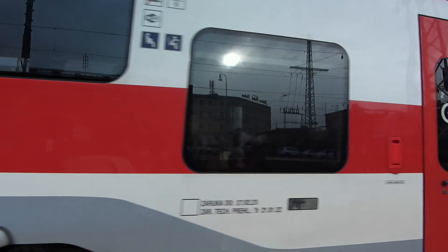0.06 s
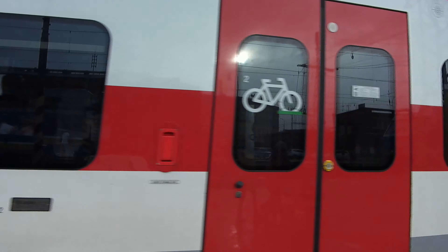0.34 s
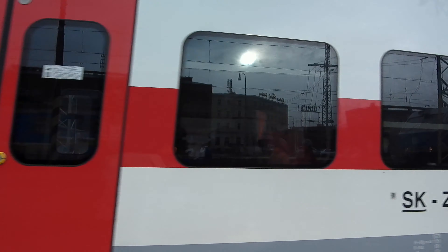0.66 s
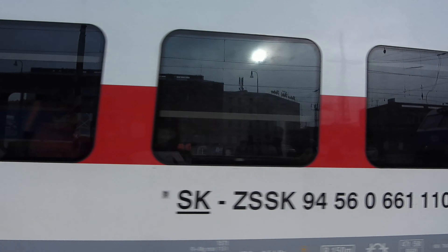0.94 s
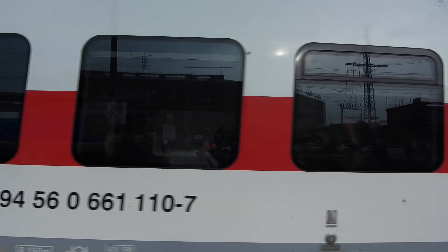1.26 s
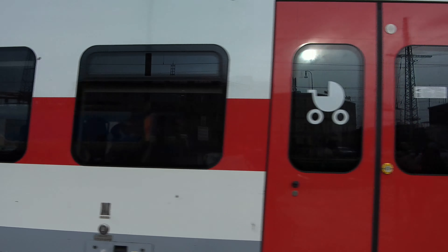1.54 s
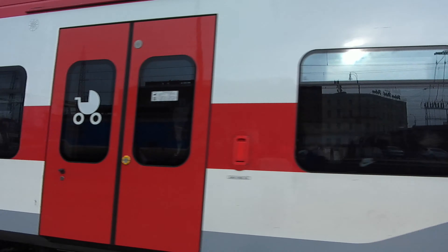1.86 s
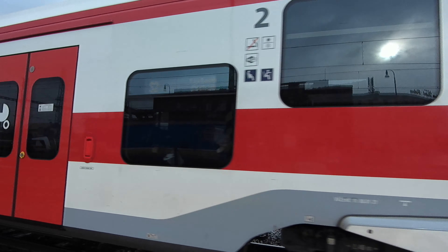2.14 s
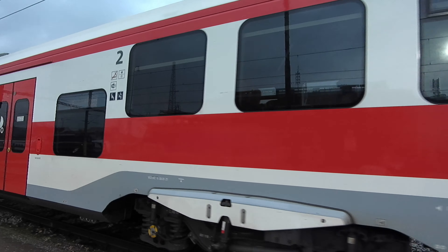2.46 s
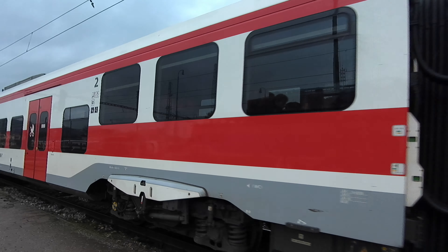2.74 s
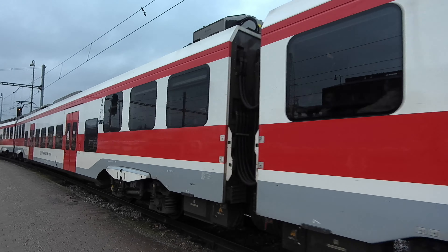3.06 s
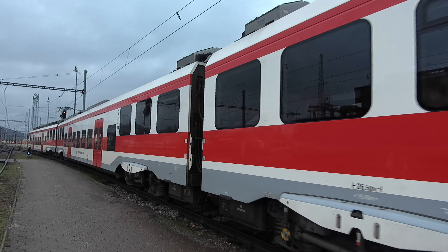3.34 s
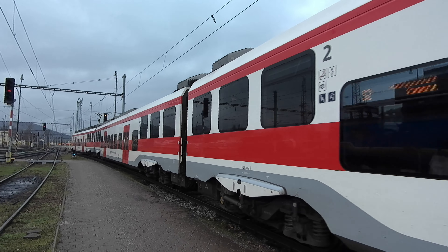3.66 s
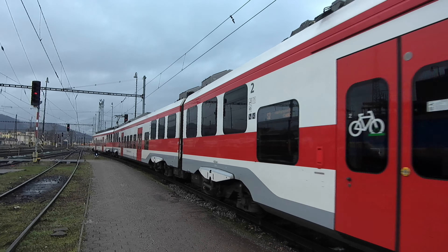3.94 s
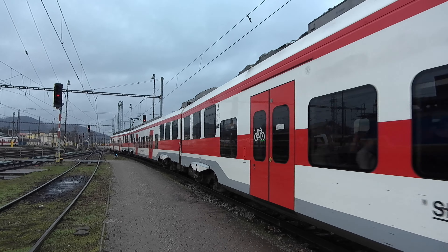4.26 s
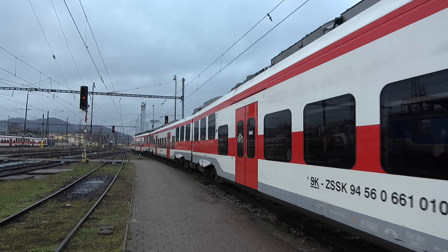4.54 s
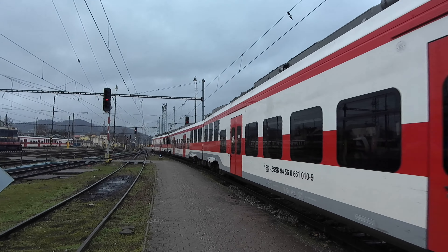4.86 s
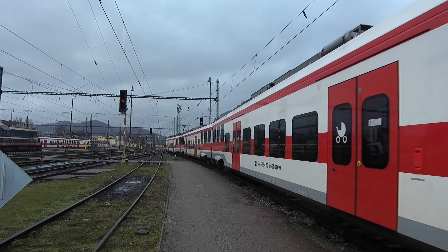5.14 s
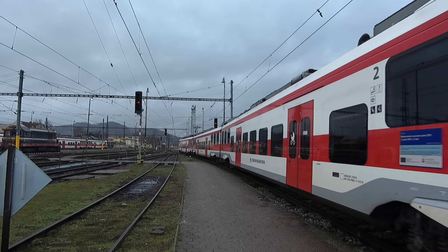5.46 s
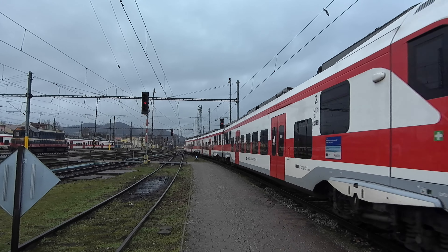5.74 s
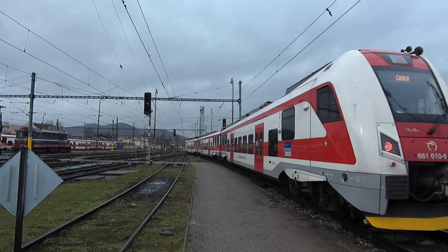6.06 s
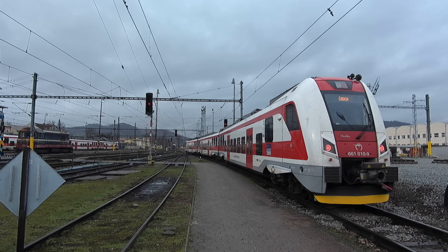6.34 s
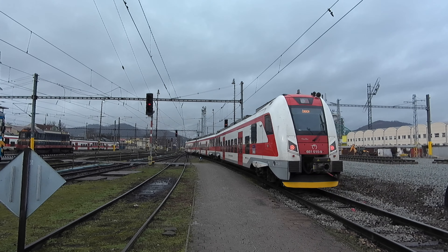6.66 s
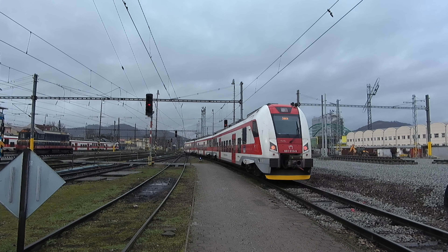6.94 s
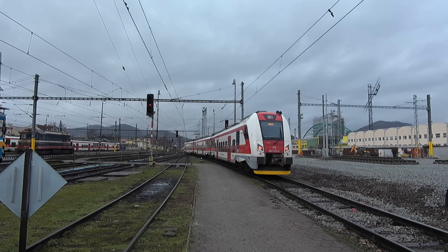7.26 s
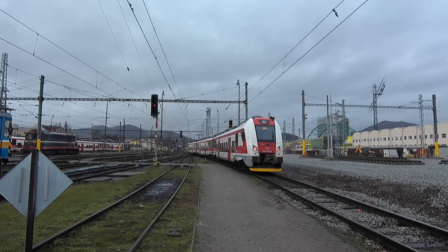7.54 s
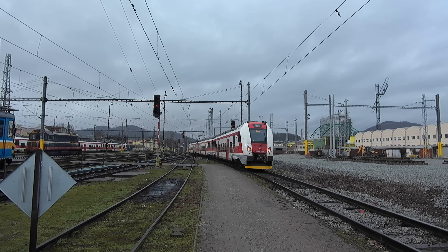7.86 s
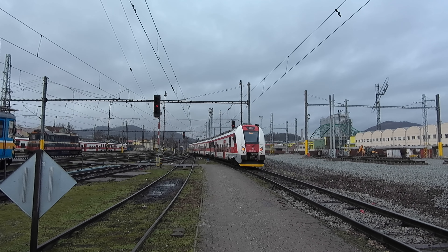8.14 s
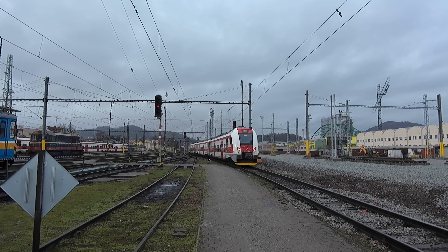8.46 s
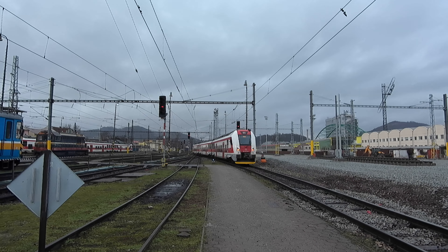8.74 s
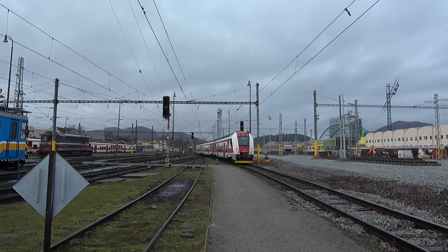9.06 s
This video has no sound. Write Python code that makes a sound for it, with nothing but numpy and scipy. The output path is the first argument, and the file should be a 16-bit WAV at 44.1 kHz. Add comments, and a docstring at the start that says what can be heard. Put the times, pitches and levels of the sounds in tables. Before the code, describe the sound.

An electric train passes close by and pulls away, wheels roaring and clacking over rail joints under a high motor whine.

```python
"""An electric train pulls away, out of doors, close to a microphone beside the track.
From the start its wheels roar on the rails over a deep rumble, the inverters sing and the motors
whine upwards. Four bogies pass in the first six seconds: their wheels clack over the joints and
make the loose track thud. At the end, far off, the last bogie clatters through a set of points."""
import sys
import numpy as np
from scipy import signal
from scipy.fft import rfft, irfft, next_fast_len
from scipy.io import wavfile

SR = 44100
rng = np.random.default_rng(int(sys.argv[2]) if len(sys.argv) > 2 else 0)


def waveform_to_disk(signal):
    """Save audio, clipped to [-1, 1], as 16-bit WAV at the path in sys.argv[1]."""
    frames = np.transpose(np.atleast_2d(signal))
    scaled = np.clip(frames, -1, 1) * 32767
    samples = np.round(scaled).astype(np.int16)
    wavfile.write(sys.argv[1], SR, samples)


N = 401751


def from_db(db):
    """Amplitude ratio: tenfold for every 20 dB."""
    return 10 ** (np.asarray(db) / 20)


def rms_one(x):
    """Normalisation to an rms of 1."""
    return x / np.sqrt(np.mean(x ** 2) + 1e-20)


def over_hz(points, count=N):
    """Interpolation of a table over log frequency, at every bin of a spectrum."""
    hz, value = np.transpose(points)
    bins = np.fft.rfftfreq(next_fast_len(count), 1 / SR)
    return np.interp(np.log(np.maximum(bins, 1)), np.log(hz), value)


def drift(rate_hz):
    """Random fluctuation: low-passed noise of rms 1."""
    step = 40
    pole = np.exp(-2 * np.pi * step * rate_hz / SR)
    slow = signal.lfilter([1], [1, -2 * pole, pole * pole], rng.standard_normal(N // step + 2002))[2000:]
    return np.interp(np.arange(N) / step, np.arange(len(slow)), rms_one(slow))


# Each row: frequency in Hz, level of the stereo difference relative to the common signal in dB.
STEREO_SPREAD = [(30, -21.5), (70, -22.5), (150, -34.5), (500, -41.5), (1000, -27.5), (1400, -20.5),
                 (1800, -9), (2200, -5), (3500, -7), (4200, 4), (5500, -3), (7000, -2.5)]

def noise(colour, count=N):
    """Partial coherence: stereo noise of rms 1, alike in the bass and largely unrelated in the treble."""
    size = next_fast_len(count)
    (low, low_db), (high, high_db) = colour[0], colour[-1]
    gain = from_db(over_hz([(low / 2, low_db - 40), *colour, (high * 2, high_db - 60)], count))
    spread = from_db(over_hz(STEREO_SPREAD, count))
    mid, side = rfft(rng.standard_normal((2, size)))
    spectrum = gain / np.hypot(1, spread) * (mid + spread * side * [[1], [-1]])
    return rms_one(irfft(spectrum, size)[:, :count])


def tone(hz, width_hz, rough):
    """Random modulation scatters the rough share of a sine's power into a narrow band."""
    phase = 2 * np.pi * np.cumsum(np.broadcast_to(hz, N)) / SR
    band = drift(width_hz) * np.cos(phase) + drift(width_hz) * np.sin(phase)
    return np.sqrt(2 * (1 - rough)) * np.cos(phase) + np.sqrt(rough) * band


LEAD_S = .05  # room for an impact to swell before its nominal time

def add(track, time_s, sound):
    """Superposition of an impact, which begins LEAD_S before its time."""
    start = round((time_s - LEAD_S) * SR)
    track[..., start:start + sound.shape[-1]] += sound[..., :N - start]


def blow(t, rise_s, t60, hold=1.66):
    """Impact envelope: a swell around t = 0, a hold that grows with the rise, then exponential decay."""
    swell = (1 + np.tanh(t / rise_s)) / 2
    return swell * from_db(-60 * np.maximum(t - hold * rise_s, 0) / t60)


def travel(t, start_m_per_s=8.45, acceleration_m_per_s2=.37):
    """Uniform acceleration: the metres that the train has covered."""
    return start_m_per_s * t + acceleration_m_per_s2 * t ** 2 / 2


# Each row: distance to go to the microphone in metres, relative level in dB, that of its hiss in dB.
BOGIES = [(.3, 1.3, .5), (23, -2.5, 0), (29.6, 0, -2.5), (50.4, -1, -2)]
BOGIE_LEVELS = [(place_m, db) for place_m, db, _ in BOGIES]

def passing_db(sources, level_db, reach_m, loss_share):
    """Inverse-square law for passing sources whose powers add; loss_share scales the result in dB."""
    gone_m = travel(np.arange(N) / SR)
    power = sum(from_db(db) ** 2 / (1 + ((gone_m - place_m) / reach_m) ** 2) for place_m, db in sources)
    return level_db + loss_share * 10 * np.log10(power)


def rail_hum(hum_hz=435, width_hz=35):
    """Resonance: rolling keeps the rail's lowest note sounding, and it carries far along the track."""
    level_db = passing_db(BOGIE_LEVELS, level_db=-44, reach_m=8, loss_share=.2)
    band_hz = hum_hz + width_hz * np.arange(-2, 3)
    return from_db(level_db) * noise(list(zip(band_hz, [-15, -3, 0, -4, -12])))


# The spectrum of shaking track. Each row: frequency in Hz, relative level in dB.
TRACK_COLOUR = [(55, -23.5), (85, -5.5), (120, -2.5), (160, -.5), (220, -4.5), (300, -11.5), (420, -20.5),
                (700, -37.5)]

def loose_track(beyond_m=12.0, jolts_db=3.0):
    """Forced vibration: a little way on, loosely packed track shakes under each bogie in turn."""
    crossings = [(place_m + beyond_m, db) for place_m, db in BOGIE_LEVELS]
    level_db = passing_db(crossings, level_db=-31, reach_m=2.0, loss_share=1)
    return from_db(level_db + jolts_db * drift(25)) * noise(TRACK_COLOUR)


# Switching sidebands. Each row: centre in Hz, width in Hz, relative level in dB.
INVERTER_BANDS = [(1520, 90, 9), (2060, 200, -2.5), (2303, 130, -1.5), (3033, 130, 4)]
# Inverters beside the driven bogies. Each row: distance to go in metres, level of the beam in dB.
INVERTERS = [(-.7, -39.5), (48.9, -45.5)]

def inverters(beam_m=4.2, spill_db=-10):
    """Directivity: rough bands of switching noise beam out sideways; little spills along the train."""
    hz = np.geomspace(1200, 3800, 300)
    spectrum = sum(from_db(db) ** 2 / (1 + (2 * (hz - centre) / width) ** 4)
                   for centre, width, db in INVERTER_BANDS)
    power = 0
    for place_m, db in INVERTERS:
        off_axis = (travel(np.arange(N) / SR) - place_m) / beam_m
        beam = 1 / (1 + off_axis ** 10)
        spill = from_db(spill_db) ** 2 / (1 + off_axis ** 2)
        power += from_db(db) ** 2 * (beam + spill)
    return np.sqrt(power) * noise(list(zip(hz, 10 * np.log10(spectrum))))


# A whine ends when the drive changes its switching pattern. Each row: start and end in seconds,
# distance to go in metres, first emitted pitch in Hz, climb in Hz per second, level alongside in dB,
# reach in metres, roughness from 0 to 1, throb rate in Hz.
WHINES = [(0, .58, 1.6, 1518, 26, -32.5, 1.6, .25, 5.4), (0, .5, 2.5, 3012, 60, -53, 2.5, .3, 5.4),
          (.74, 1.6, 2.6, 1530, 18, -35.5, 2.5, .75, 3), (0, 2.2, .3, 1606, 95, -45.5, 2.5, .65, 2.8),
          (1.66, 3.1, 1.1, 1480, 78, -33, 2.5, .25, 2), (4.97, 5.38, 52.3, 1484, 52, -39, 4, .65, 8.6),
          (5.38, 6.25, 48, 1528, 46, -37.5, 6, .35, 5), (6.35, 6.55, 48, 1565, 20, -42, 6, .7, 5),
          (4.55, 8.1, 50.5, 1951, 56, -53, 9, .7, 2.6), (5.8, 6.8, 55, 3125, 0, -64.5, 7, .9, 2),
          (7, 9.11, 51, 1455, 20, -39, 2.5, .55, 1.6)]

def motors(octave_db=-18.5, fade_s=.072, distance_m=4.0, throb_db=1.5, sound_m_per_s=343):
    """Doppler effect: each throbbing whine climbs as the train gains speed and sags as it goes by."""
    out, t = np.zeros(N), np.arange(N) / SR
    for start_s, end_s, place_m, hz, climb, db, reach_m, rough, throb_hz in WHINES:
        receding_m_per_s = np.gradient(np.hypot(travel(t) - place_m, distance_m), t)
        pitch = (hz + climb * (t - start_s)) / (1 + receding_m_per_s / sound_m_per_s)
        sounding = np.clip(1 + np.minimum(t - start_s, end_s - t) / fade_s, 0, 1)
        throb = throb_db * (1 - rough) * np.cos(2 * np.pi * throb_hz * (t - start_s))
        whine = tone(pitch, width_hz=18, rough=rough)
        octave = from_db(octave_db) * tone(2 * pitch, width_hz=26, rough=rough)
        level_db = passing_db([(place_m, 0)], db, reach_m, loss_share=.8)
        out += sounding * from_db(level_db + throb) * (whine + octave)
    return out


# Spectra of the parts that rolling shakes. Each row: frequency in Hz, relative level in dB.
GROUND_COLOUR = [(12, -18), (22, -2.5), (33, -1.5), (60, -2), (90, -8), (130, -13), (200, -17), (300, -35)]
BOOM_COLOUR = [(170, -14), (280, 0), (350, -1), (460, 1.5), (600, -4), (740, -6.5), (1100, -32)]
ROAR_COLOUR = [(500, -12.5), (780, -3.5), (1050, 1), (1300, -4), (1500, -7.5), (1750, -14.5), (2100, -13.5),
               (2600, -26), (3600, -46.5)]
HISS_COLOUR = [(1100, -12.5), (1700, 3), (2200, 4.5), (2700, 2), (3600, 4), (4800, -11), (5500, -1.5),
               (6000, -6.5), (6700, -36), (9000, -23.5), (12000, -19.5), (15700, -26)]
# How each part carries. Each row: base level in dB, reach in metres, share of the loss with distance.
CARRY = {"ground": (-29.4, 8, .5), "track": (-34.8, 8, .78), "bogies": (-30.5, 4, .51),
         "wheels": (-34.8, 4, .56), "rails": (-54.6, 3, .58)}

def rolling(chatter_db=1.9, load_db=.8, jolts_db=2.2, heave_db=1.5):
    """Roughness excitation: treads under a shifting load shake ground, track, bogies, wheels, rails."""
    level = {part: passing_db(BOGIE_LEVELS, *CARRY[part])
             for part in ("ground", "track", "bogies", "wheels")}
    hiss_db = passing_db([(place_m, db) for place_m, _, db in BOGIES], *CARRY["rails"])
    load, jolts = load_db * drift(25), jolts_db * drift(25)
    ground = from_db(level["ground"] + heave_db * drift(6)) * noise(GROUND_COLOUR)
    track = from_db(level["track"] + jolts) * noise(TRACK_COLOUR)
    bogies = from_db(level["bogies"] + load) * noise(BOOM_COLOUR)
    wheels = from_db(level["wheels"] + load) * noise(ROAR_COLOUR)
    rails = from_db(hiss_db + chatter_db * drift(35)) * noise(HISS_COLOUR)
    return ground + track + bogies + wheels + rails


# The spectrum of shaken ballast. Each row: frequency in Hz, relative level in dB.
BALLAST_COLOUR = [(70, -19.5), (130, -1), (200, 1.5), (300, -3.5), (400, -7.5), (700, -27)]
# The track dips under an axle. Each row: time in seconds, relative level in dB, pitch in Hz,
# length as a multiple of the usual swell.
THUDS = [(0.178, -10, 176, 1.3), (0.198, -10, 140, 1.3), (0.262, -11, 100, 1.3), (0.265, -11, 175, 1),
         (0.45, -15, 190, 1), (0.538, -11, 143, 1), (0.563, -.5, 205, .65), (0.851, -15, 184, 1),
         (1.13, -10.5, 205, 1.1), (1.182, -16, 189, 1), (1.22, -17, 174, 1), (1.328, -12, 66, 1.4),
         (1.398, -15, 219, 1), (1.477, -17, 206, 1), (1.558, -12, 80, 1), (1.56, -15, 189, 1),
         (1.621, -13, 150, 1), (1.785, -18, 180, 1), (2.227, -8, 79, 1), (2.445, -14, 90, 1.4),
         (2.502, -10.5, 80, 1), (2.505, -13, 204, 1), (2.538, -14, 139, 1), (2.575, -14, 77, 1.3),
         (2.738, -15, 208, 1), (2.823, .3, 275, .45), (2.843, -10, 230, .7), (3.01, -15, 170, 1),
         (3.087, -15, 260, 1), (3.12, -15.5, 85, 1.3), (3.326, -5.5, 185, 1.1), (3.343, -14, 78, 1.3),
         (3.396, -14, 240, 1), (3.589, -11, 214, 1.2), (3.648, -12, 91, 1), (3.657, 0, 250, .42),
         (3.674, -13, 270, .8), (3.757, -15, 189, 1), (3.794, -16, 190, 1), (3.829, -12, 71, 1.1),
         (3.939, -16, 185, 1), (4.152, -3.5, 195, .9), (4.176, -9, 160, .8), (4.208, -9.5, 196, 1.1),
         (4.327, -10, 78, 1), (4.39, -12, 269, 1), (4.527, -11, 157, 1), (4.587, -13, 173, 1),
         (4.593, -8.5, 86, 1), (4.725, -14, 165, 1), (5.155, -11, 80, 1.4), (5.433, -9, 252, 1),
         (5.605, -15, 221, 1), (5.645, -15, 214, 1), (5.675, -14, 88, 1), (5.681, .5, 280, .75),
         (5.86, -16, 200, 1), (6.14, -8.5, 202, 1.4), (6.377, -9, 263, 1), (6.63, -17, 220, 1),
         (8.283, -17, 200, 1.3), (8.53, -14, 100, 1.2)]

def thuds(swing_db=-2, swell_s=.008, grow_s=.0045, settle_s=.0058, shake_db=-16):
    """Damped oscillation: rail and sleeper swing a few cycles on the ballast, which goes on shaking."""
    t = np.arange(SR // 2) / SR - LEAD_S
    swings, shake = np.zeros((2, N))
    for time_s, db, hz, length in THUDS:
        past_peak = t / length - swell_s
        swell = 2 * np.exp(-np.logaddexp(-past_peak / grow_s, past_peak / settle_s))
        add(swings, time_s, from_db(db + swing_db) * swell * -np.sin(2 * np.pi * hz * t))
        add(shake, time_s, length * from_db(db + shake_db) * blow(t, rise_s=.015, t60=.19))
    return swings + shake * noise(BALLAST_COLOUR)


# Bogie and wheel modes. Each row: frequency in Hz, relative level in dB, time to fall 60 dB in seconds.
WHEEL_MODES = [(314.7, -7, 0.14), (437, -9, .05), (563, -1, 0.054), (862, -9, 0.053), (1016, -0.5, 0.058),
               (1360, -13.5, 0.034), (1450, -14, 0.09)]

def struck_modes(t, rise_s, tuning, knock_db, clang_db, chance, strike_db=8, hard_s=.006):
    """Modal ringing: the shorter the blow, the more strongly it excites bogie and wheel."""
    hz, mode_db, t60 = np.transpose(WHEEL_MODES)[:, :, None]
    after = np.maximum(t, 0)
    level_scatter, pitch_scatter = chance
    is_knock = hz < 900  # low modes knock, high ones clang
    tuned_hz = hz * np.where(is_knock, tuning, 1 + .04 * pitch_scatter)
    level_db = np.where(is_knock, knock_db, clang_db) + strike_db + mode_db + 2 * level_scatter
    modes = from_db(level_db - 60 * after / t60) * np.sin(2 * np.pi * tuned_hz * after)
    hardness = 1 / (1 + (rise_s / hard_s) ** 2)
    onset = np.tanh(after / .00084) ** 2
    return hardness * onset * (modes[::2].sum(0) - modes[1::2].sum(0))  # modes alternate in sign


# Spectra of the noises of a blow. Each row: frequency in Hz, relative level in dB.
KNOCK_COLOUR = [(130, -22.5), (280, 1.5), (420, -1), (560, 3.5), (700, -3.5), (850, -11.5), (1200, -25)]
CLANG_COLOUR = [(650, -15.5), (900, 1), (1040, 4), (1300, -1.5), (1550, -8.5), (1800, -15), (2100, -19),
                (2500, -26), (3200, -35)]
SCRAPE_COLOUR = [(1100, -12), (1450, 1), (1900, 0), (2250, -5), (2600, -12), (3200, -28)]
RING_COLOUR = [(1500, -12.5), (2200, 2), (2700, 4), (3100, 4), (3800, 7.5), (4800, -7.5), (5550, 7),
               (6100, -4.5), (6800, -26), (10000, -18), (15700, -21)]
# Notes of the rail between sleepers, and of the wheel. Each row: pitch in Hz, relative level in dB.
RAIL_MODES = [(440, -4), (620, -8), (900, -5), (1130, -1), (1390, -6)]
CHIME_MODES = [(1730, 0), (1900, -5), (2500, -9), (3640, -15), (5450, -21)]
# Kinds of rail gap, from plain joints to points; "crossing" is a wide gap met with a slow blow. Each row: rise
# in seconds, base levels of knock, clang and ring in dB, base decay time in seconds, base levels of singing,
# scrape and chime in dB.
JOINTS = {"stepped": (.004, -16.7, -28.3, -58.5, .22, -47, -54, -58),
          "open": (.004, -23.5, -27.3, -55.5, .25, -44, -47, -53),
          "worn": (.008, -20.5, -37.3, -63, .19, -52, -58, -64),
          "crossing": (.011, -21, -27.3, -53, .24, -44, -39.5, -46),
          "blade": (.0035, -39, -32.5, -78, .26, -42, -48.5, -53)}
# A wheel strikes a gap. Each row: time in seconds, kind of gap, offsets of knock, clang and ring in dB,
# pitch of the knock in Hz.
CLACKS = [(0.250, "stepped", 0, -1, -4, 530), (0.447, "stepped", -3, 1, 0, 520),
          (0.478, "worn", -4, 5, -3, 480), (0.562, "worn", 2, 1, -2, 430),
          (0.751, "open", -3.5, 1.5, 1, 560), (1.41, "worn", -5, -6, -7, 420),
          (1.628, "worn", -5, -6, -7, 420), (2.231, "stepped", 1, 2, 4, 610),
          (2.547, "stepped", .5, .5, -3, 560), (2.726, "open", 1.5, 1, 4, 660),
          (2.819, "stepped", 0, 0, -1, 590), (3.0, "crossing", -6, -1, 3, 590),
          (3.085, "stepped", .5, -2, -2, 500), (3.308, "worn", -1, 4, -1, 460),
          (3.564, "open", 4, 3.5, 5, 590), (3.653, "worn", -1, 1, 1, 540), (3.826, "open", 1, 1, -1, 640),
          (4.138, "worn", -1, -3, 3, 490), (4.385, "worn", 1, -1, 1, 530),
          (5.137, "stepped", -3, -11, 0, 450), (5.425, "stepped", 5, 4, 4, 590),
          (5.599, "open", .5, -2.5, -5, 560), (5.677, "stepped", -2, -2, 0, 530),
          (5.847, "crossing", -3.5, -2, -3.5, 590), (6.132, "worn", -3.5, -4, -2, 460),
          (6.372, "open", .5, -.5, 0, 540), (6.555, "blade", -2, -5, 0, 560),
          (6.616, "crossing", -1, -3.5, -5, 520), (8.224, "blade", -3, 3, 3, 560),
          (8.284, "stepped", -4, -1, -2, 600), (8.298, "open", -2, -4.5, -6, 580),
          (8.456, "blade", 2, 5, 6, 560), (8.516, "crossing", -2.5, -1, -3.5, 620),
          (8.795, "blade", 0, -7, -3, 560), (9.034, "blade", 5, -3, 5, 540)]

def clacks(untuned_hz=560, ring_lag_s=.005, sing_rise_s=.012, rattle_db=2.5, sizzle_db=2.0):
    """Impact excitation: the bogie knocks, the wheel clangs, chimes and scrapes, the rail rings on."""
    t = np.arange(SR // 2) / SR - LEAD_S
    strikes, knock = np.zeros(N), np.zeros((2, N))
    clang, ring, sing, scrape, chime = np.zeros((5, N))  # envelopes
    chances = rng.standard_normal((len(CLACKS), 2, len(WHEEL_MODES), 1))
    for (time_s, joint, *offsets_db, knock_hz), chance in zip(CLACKS, chances):
        rise_s, *base_db, t60, sing_db, scrape_db, chime_db = JOINTS[joint]
        knock_db, clang_db, ring_db = np.add(base_db, offsets_db)
        clang_offset_db = offsets_db[1]
        tuning = knock_hz / untuned_hz
        add(strikes, time_s, struck_modes(t, rise_s, tuning, knock_db, clang_db, chance))
        body = noise([(hz * tuning, db) for hz, db in KNOCK_COLOUR], count=len(t))
        add(knock, time_s, from_db(knock_db - 1) * blow(t, rise_s, .86 * t60) * body)
        add(chime, time_s, from_db(chime_db - 5 + clang_offset_db / 2) * blow(t, rise_s, t60=.3))
        add(clang, time_s, from_db(clang_db + 1) * blow(t, rise_s, .96 * t60))
        add(ring, time_s, from_db(ring_db + 1) * blow(t - ring_lag_s, rise_s + ring_lag_s, .85 * t60))
        add(scrape, time_s, from_db(scrape_db) * blow(t, rise_s, t60))
        add(sing, time_s, from_db(sing_db + clang_offset_db) * blow(t - sing_rise_s, sing_rise_s, t60=.6))
    # loose gear rattles and steel sizzles on steel while the blow dies away
    rattle, sizzle = from_db(rattle_db * drift(47)), from_db(sizzle_db * drift(150))
    rail_notes = sum(from_db(db) * tone(hz, width_hz=40, rough=1) for hz, db in RAIL_MODES)
    wheel_notes = sum(from_db(db) * tone(hz, width_hz=45, rough=1) for hz, db in CHIME_MODES)
    wheel_noise = clang * noise(CLANG_COLOUR) + scrape * noise(SCRAPE_COLOUR)
    rail_noise = sizzle * ring * noise(RING_COLOUR)
    return strikes + knock + chime * wheel_notes + rattle * (wheel_noise + rail_noise) + sing * rail_notes


def scene():
    """Superposition: the sounds of train and track add in the open air."""
    return rail_hum() + loose_track() + inverters() + motors() + rolling() + thuds() + clacks()


# The microphone's two ports. Each row: frequency in Hz, left level minus right in dB.
PORT_BALANCE = [(100, -.3), (450, -.2), (1100, 1), (1500, 2), (1950, 6), (2400, 4), (2800, 1), (3050, -5),
                (3900, -8), (5500, -6), (9000, -4), (11000, 1)]
# Each row: frequency in Hz, phase by which the left port lags in radians.
PORT_LAG = [(20, 0), (200, .01), (500, .06), (1000, .15), (2000, .5), (2500, .8), (2800, 1.7), (3350, 3.1),
            (5400, 4)]
# The microphone's own hiss. Each row: frequency in Hz, relative level in dB.
MIC_HISS_COLOUR = [(3000, -0.5), (7000, -3.5), (11000, 1), (15700, -1)]

def record(dry, hiss_db=-83.5, overload=.96, notch_hz=4490, notch_width_hz=800, cutoff_hz=15750):
    """Transduction: two ports colour and delay the sound; hiss, clipping, a notch and a top cut follow."""
    size = next_fast_len(N)
    side = np.array([[1], [-1]]) / 2
    ports = from_db(side * over_hz(PORT_BALANCE)) * np.exp(-1j * side * over_hz(PORT_LAG))
    heard = irfft(rfft(dry, size) * ports, size)[:, :N]
    heard += from_db(hiss_db) * noise(MIC_HISS_COLOUR)
    heard = np.clip(heard, -overload, overload)
    heard = signal.lfilter(*signal.iirnotch(notch_hz, notch_hz / notch_width_hz, fs=SR), heard)
    return signal.sosfilt(signal.ellip(10, .1, 80, cutoff_hz, fs=SR, output="sos"), heard)


dry = scene()
out = record(dry)
waveform_to_disk(out)
```